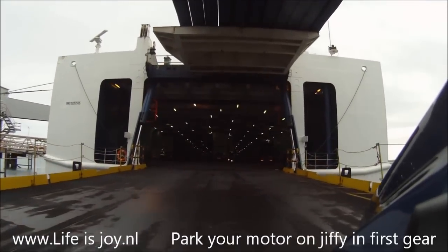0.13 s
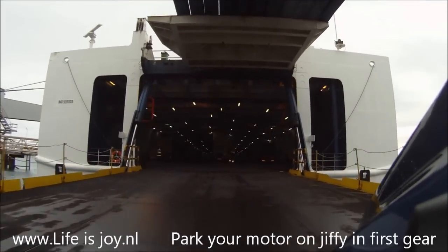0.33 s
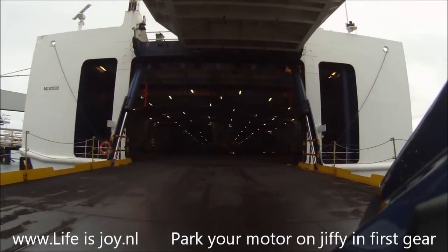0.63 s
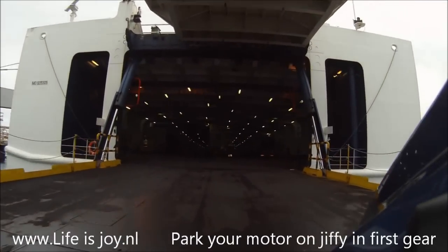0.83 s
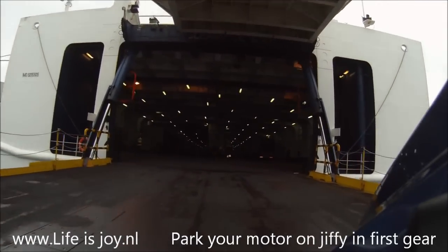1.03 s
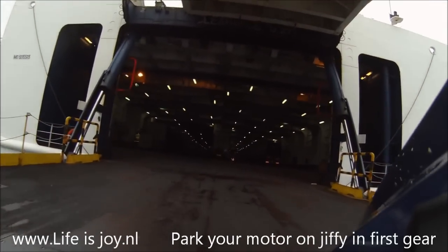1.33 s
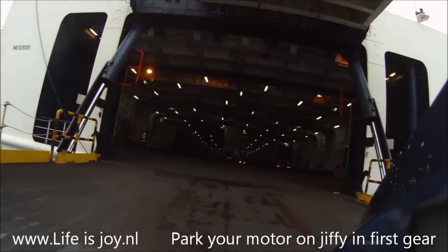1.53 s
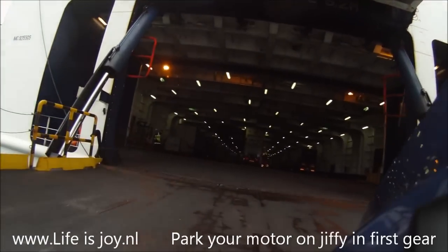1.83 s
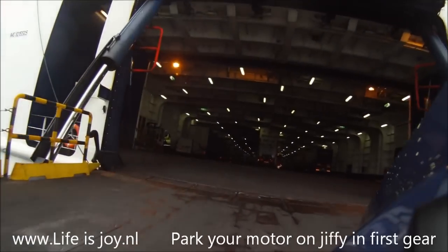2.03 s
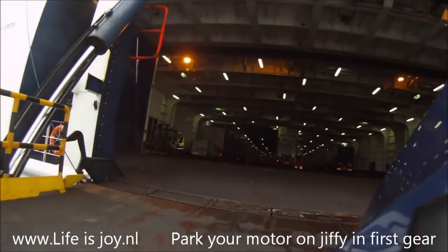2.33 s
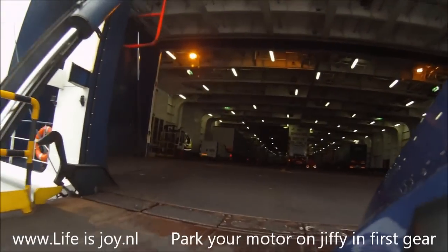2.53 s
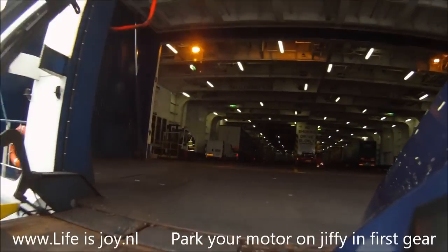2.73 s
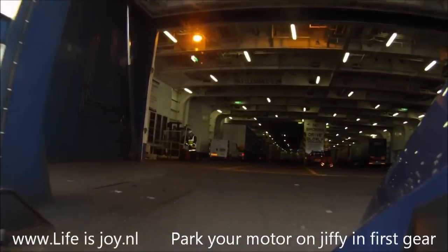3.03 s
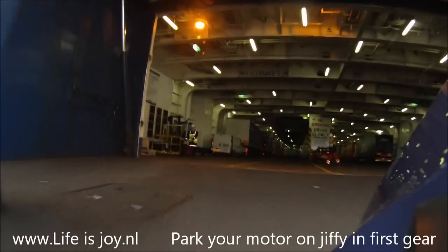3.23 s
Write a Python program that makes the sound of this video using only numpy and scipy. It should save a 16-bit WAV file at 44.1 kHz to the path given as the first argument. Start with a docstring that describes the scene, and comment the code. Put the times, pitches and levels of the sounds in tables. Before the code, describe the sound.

Motorcycle engine clatters and rings steadily up a ramp, then throttle closes and it sags

```python
"""Dense clatter and a frame ring at running speed: a twin-cylinder motorcycle climbs a steel ramp,
heard by a camera in a sealed case. Firings thump a pipe resonance, blows ring frame modes, valve
gear clacks, clicks and noise are coloured by the case. At 2.2 s the throttle closes, the ring drops
away and the engine sags to a tick-over. Filtered noise makes road rumble, hiss, a gust and a weaker
puff; three soft pulses ring the case as knocks."""
import sys
import numpy as np
from scipy import signal
from scipy.io import wavfile
from scipy.ndimage import uniform_filter1d

SR = 44100
rng = np.random.default_rng(int(sys.argv[2]) if len(sys.argv) > 2 else 0)


def wav_record(signal):
    """Record a signal, one row per channel, as 16-bit PCM in the file named by sys.argv[1]."""
    frames = np.transpose(np.atleast_2d(signal))
    bounded = np.clip(frames, -1, 1)
    # unit amplitude maps onto the largest positive 16-bit level
    quanta = np.round(bounded * 32767).astype(np.int16)
    wavfile.write(sys.argv[1], SR, quanta)


def natural_amplitude(level_db):
    """Convert a level in decibels to a linear amplitude factor, elementwise."""
    exponent = np.asarray(level_db, float) / 20
    return 10 ** exponent


N = 149058
T_S = np.arange(N) / SR

# Engine speed: t/s, rate/(cycles/s)
ENGINE_SPEED = [(0, 16.13), (.2, 17.51), (.45, 17.09), (.7, 17.1), (.95, 17.23), (1.2, 17.18), (1.5, 17.29),
                (1.8, 17.17), (2.05, 17.13), (2.17, 17.36), (2.27, 13.98), (2.5, 13.88), (2.65, 11.89),
                (2.85, 10.53), (3.05, 9.43), (3.38, 8.94)]
START_CYCLES = .03
# Source gains: t/s, exhaust thump/dB, frame ring/dB, clacks/dB, clatter/dB, treble hiss/dB
SOURCE_GAINS = [(0, -53, -40.5, -57.5, -37, -60.5), (.1, -58.5, -44.5, -55.5, -39.5, -64),
                (.6, -57, -45, -58, -39, -64.5), (1.1, -58.5, -45, -57.5, -38.5, -64),
                (1.3, -58.5, -43.5, -57, -38, -64), (1.7, -56, -44.5, -54.5, -39.5, -64),
                (2.12, -58, -43.5, -57, -38, -64), (2.2, -60.5, -53, -54.5, -40.5, -64),
                (2.32, -66.5, -86, -55, -42.5, -66), (2.55, -65, -89, -55, -44.5, -67.5),
                (2.8, -69.5, -86, -65.5, -44, -70), (3.05, -66, -85, -65.5, -46, -72),
                (3.38, -67.5, -59, -61, -46, -72.5)]

# Rolling rumble spectrum: f/Hz, relative density/dB
ROAD_SPECTRUM = [(25, -23), (75, -15), (113, -4.5), (151, 0), (335, -10.5), (549, -20), (599, -7),
                 (653, -9), (800, -16), (1040, -67)]
ROAD_START_DB, ROAD_CHANGE_DB = -63.5, -2.5
# Gust spectrum: f/Hz, relative density/dB
GUST_SPECTRUM = [(110, -40), (190, -13.5), (296, -11.5), (500, -12.5), (749, -10.5), (810, -8.5),
                 (1050, -40)]
# Gust, then weaker puff: t/s, gain/dB
GUST_GAIN = [(1.08, -68), (1.13, -53.5), (1.2, -51), (1.33, -54), (1.53, -58.5), (1.62, -60.5),
             (1.8, -67.5), (2.22, -72.5), (2.3, -63), (2.38, -71), (2.8, -99)]
# Wind whistles: start f/Hz, f/Hz half a second on
WIND_MOANS = [(590, 580), (330, 420)]
MOAN_PASS_WIDTH_HZ, MOAN_DB = 12, -9.5

# Hiss spectrum: f/Hz, relative density/dB
HISS_SPECTRUM = [(3180, -13), (5400, -5), (7500, -9.5), (8710, -6), (11000, -15), (11900, -13.5),
                 (13000, -19.5), (15400, -16.5)]
HISS_THROB_PEAK_DB, HISS_WANDER_RMS_DB, HISS_PLACE_CYCLES = 2, .4, .21
HISS_CLICKS_PER_S, HISS_SPREAD_DB, HISS_CLICKS_OVER_NOISE = 650, 3.3, .32

# Knocks on the case: t/s, pulse area/dB, pitch factor
CASE_TAPS = [(2.305, -33, 1), (3.1845, -27, 1), (3.272, -56, .62)]
# Case modes at pitch factor 1: f/Hz, level/dB, t60/s
CASE_MODES = [(1018, -7.5, 0.06), (1233, -1, 0.058), (1286, 5, 0.054)]

# Firings: place/cycles, level/dB
CYLINDER_FIRINGS = [(.919, 0), (.547, -9.5)]
FIRE_JITTER_S, FIRE_SPREAD_DB = .0002, .7
PIPE_HZ, PIPE_PASS_WIDTH_HZ, PIPE_SKIRT_DB = 148.5, 29, -30

# Valve gear: place/cycles, ring f/Hz, first-pass width/Hz, level/dB, twice chatter rise t/s
VALVE_CLACKS = [(.955, 2650, 380, 2.5, .0035), (.955, 3200, 300, -6, .005), (.99, 1850, 220, -5, .008),
                (.97, 1280, 220, 4, .006), (.45, 2600, 380, -2, .003), (.45, 1280, 220, 3, .009),
                (.32, 1280, 220, 0, .004), (.83, 1280, 220, -1, .004), (.83, 4750, 280, -9, .004),
                (.71, 4100, 220, -11, .009)]
CLACK_JITTER_S, CLACK_SPREAD_DB, CLACK_BLOW_OVER_CHATTER = .0004, 1.5, 1.1

# Blows on the lower frame modes: place/cycles, level/dB
LOWER_FRAME_BLOWS = [(.02, 0), (.675, -9)]
# Close pair of frame modes: f/Hz, level/dB, t60/s
FRAME_MODES = [(862, 0, .2), (884, -5, .16)]
# Blows on the higher frame mode: place/cycles, level/dB
UPPER_FRAME_BLOWS = [(.41, 0), (0, -4)]
FRAME_JITTER_S, FRAME_SPREAD_DB, FRAME_ROUGH_GAIN = .00006, .8, .15
UPPER_HZ, UPPER_FIRST_WIDTH_HZ, UPPER_DB = 1051, 71, -5.5

# Clatter colour through the case: f/Hz, relative density/dB
CASE_SPECTRUM = [(460, -42), (813, -31), (883, -7.5), (912, -8), (1120, -6.5), (1330, 1), (1400, -3.5),
                 (1530, -8.5), (1850, -13), (1980, -16), (2220, -23), (2390, -16.5), (2670, -12.5),
                 (2940, -21.5), (3280, -17), (3620, -27.5), (4090, -21), (4410, -24.5), (4830, -18.5),
                 (5110, -23), (5600, -53), (7280, -93)]
CLATTER_CLICKS_PER_S, CLATTER_SPREAD_DB, CLATTER_NOISE_OVER_CLICKS = 2500, 1.2, 1.1
LUMP_FAST_RMS_DB, LUMP_SLOW_RMS_DB = .2, 2
CHUG_PLACE_CYCLES, CHUG_RISE_S, CHUG_GAIN, CHUG_TOP_HZ = .935, .006, 2.8, 3500


def evened(x):
    """Scales to rms 1."""
    return x / np.sqrt(np.mean(x ** 2) + 1e-20)


def curve(rows, column):
    """Interpolates one table column along time."""
    rows = np.array(rows)
    return np.interp(T_S, rows[:, 0], rows[:, column])


def colour(x, points):
    """Minimum-phase filter with the given spectrum, floored at -90 dB; output rms 1."""
    f_hz, level_db = np.transpose(points)
    grid_hz = np.fft.rfftfreq(8192, 1 / SR)
    grid_db = np.interp(np.log(grid_hz + 1), np.log(f_hz + 1), level_db, -90, -90)
    log_gain = np.log(natural_amplitude(np.maximum(grid_db, -90)))
    log_gain = np.r_[log_gain, log_gain[-2:0:-1]]
    # Hilbert transform of the log gain gives the phase
    response = np.fft.ifft(np.exp(np.conj(signal.hilbert(log_gain)))).real[:4096]
    return evened(signal.oaconvolve(x, response)[:N])


def resonate(x, hz, width_hz):
    """One-pole complex resonance, peak gain about 1."""
    pole = np.exp((2j * np.pi * hz - np.pi * width_hz) / SR)
    return 2 * signal.lfilter([1 - abs(pole)], [1, -pole], x).real


def resonate_twice(x, hz, first_width_hz, second_width_hz):
    """Two resonances in series, for steeper skirts."""
    return resonate(resonate(x, hz, first_width_hz), hz, second_width_hz)


def above(x, hz):
    """Steep high-pass."""
    return signal.sosfilt(signal.butter(8, hz, "high", fs=SR, output="sos"), x)


def ring(x, modes):
    """Pulses excite exponentially decaying sine modes."""
    t_s = T_S[:SR // 4]
    response = sum(natural_amplitude(db - 60 * t_s / t60_s) * np.sin(2 * np.pi * hz * t_s) for hz, db, t60_s in modes)
    return signal.oaconvolve(x, response)[:N]


def turns():
    """Integrates engine speed to cycles completed."""
    return START_CYCLES + np.cumsum(curve(ENGINE_SPEED, 1)) / SR


def beats(place_cycles, jitter_s, spread_db):
    """One click per cycle, with normal scatter in time and level."""
    at_s = np.interp(np.arange(-1, 60) + place_cycles, np.r_[-.2, turns()], np.r_[0, T_S], -1, -1)
    chance = rng.standard_normal((len(at_s), 2))
    index = np.round(abs(at_s + jitter_s * chance[:, 0]) * SR).astype(int)
    keep = (at_s >= 0) & (index < N)
    out = np.zeros(N)
    out[index[keep]] = natural_amplitude(spread_db * chance[keep, 1])
    return out


def beat_pattern(rows, jitter_s, spread_db):
    """Sums the clicks of a place and level table."""
    return sum(natural_amplitude(db) * beats(place, jitter_s, spread_db) for place, db in rows)


def grit(clicks_per_s, spread_db, noise_gain):
    """Random clicks of either sign, a few large, over smooth noise."""
    size = natural_amplitude(spread_db * np.minimum(rng.exponential(1, N), 5))
    present = rng.random(N) < clicks_per_s / SR
    clicks = size * present * rng.choice([-1., 1.], N)
    return evened(clicks) + noise_gain * rng.standard_normal(N)


def slow_noise(window):
    """Noise averaged twice over a window in samples; rms 1."""
    return evened(uniform_filter1d(uniform_filter1d(rng.standard_normal(N), window), window))


def air():
    """Tyres and wind: low coloured noise, plus a gust with faint gliding narrow-band moans."""
    gust = colour(rng.standard_normal(N), GUST_SPECTRUM)
    start_s = GUST_GAIN[0][0]
    for start_hz, end_hz in WIND_MOANS:
        glide_hz = np.interp(T_S, [start_s, start_s + .5], [start_hz, end_hz])
        spin = np.exp(2j * np.pi * np.cumsum(glide_hz) / SR)
        flutter = resonate_twice(rng.standard_normal(N), 0, MOAN_PASS_WIDTH_HZ, MOAN_PASS_WIDTH_HZ)
        gust = gust + natural_amplitude(MOAN_DB) * evened((spin * flutter).real)
    road_db = ROAD_START_DB + ROAD_CHANGE_DB * T_S / T_S[-1]
    road = natural_amplitude(road_db) * colour(rng.standard_normal(N), ROAD_SPECTRUM)
    return natural_amplitude(curve(GUST_GAIN, 1)) * gust + road


def hiss():
    """Airborne treble noise that swells twice a cycle and wanders a little."""
    swell_db = HISS_THROB_PEAK_DB * np.cos(4 * np.pi * (turns() - HISS_PLACE_CYCLES))
    throb = natural_amplitude(swell_db + HISS_WANDER_RMS_DB * slow_noise(1800))
    drive = grit(HISS_CLICKS_PER_S, HISS_SPREAD_DB, 1 / HISS_CLICKS_OVER_NOISE) * throb
    return natural_amplitude(curve(SOURCE_GAINS, 5)) * colour(drive, HISS_SPECTRUM)


def taps():
    """Something knocks against the case: soft pulses ring its modes."""
    out = np.zeros(N)
    soft = np.hanning(30)
    for t_s, db, pitch in CASE_TAPS:
        blow = np.zeros(N)
        blow[round(t_s * SR):][:30] = natural_amplitude(db) * soft / soft.sum()
        modes = [(hz * pitch, level_db, t60_s) for hz, level_db, t60_s in CASE_MODES]
        out += above(ring(blow, modes), 800 * pitch)
    return out


def exhaust():
    """Each firing thumps a pipe resonance with a weak, broader skirt."""
    fire = beat_pattern(CYLINDER_FIRINGS, FIRE_JITTER_S, FIRE_SPREAD_DB)
    pipe = evened(resonate_twice(fire, PIPE_HZ, PIPE_PASS_WIDTH_HZ, PIPE_PASS_WIDTH_HZ))
    skirt = evened(resonate(fire, 133, 180))
    return natural_amplitude(curve(SOURCE_GAINS, 1)) * evened(pipe + natural_amplitude(PIPE_SKIRT_DB) * skirt)


def clacks():
    """Valve gear: at fixed places a blow and its short noise chatter excite a resonance."""
    out = np.zeros(N)
    # resonances at the same place share their blows
    hits = {place: beats(place, CLACK_JITTER_S, CLACK_SPREAD_DB) for place, *_ in VALVE_CLACKS}
    for place, hz, width_hz, db, length_s in VALVE_CLACKS:
        t = T_S[:1500] / length_s
        envelope = signal.oaconvolve(hits[place], t * np.exp(-2 * t))[:N]
        noise = envelope * rng.standard_normal(N)
        chatter = evened(resonate_twice(noise, hz, width_hz, 1.07 * width_hz))
        blow = evened(resonate_twice(hits[place], hz, width_hz, 1.07 * width_hz))
        out += natural_amplitude(db) * evened(chatter + CLACK_BLOW_OVER_CHATTER * blow)
    return natural_amplitude(curve(SOURCE_GAINS, 3)) * above(out, 844)


def frame():
    """Blows locked to the cycle ring a close pair of frame modes and one higher up."""
    blows = beat_pattern(LOWER_FRAME_BLOWS, FRAME_JITTER_S, FRAME_SPREAD_DB)
    pair = evened(above(resonate(ring(blows, FRAME_MODES), 890, 70), 825))
    rough = evened(resonate_twice(rng.standard_normal(N), 878, 41, 41))
    blows = beat_pattern(UPPER_FRAME_BLOWS, FRAME_JITTER_S, FRAME_SPREAD_DB)
    upper = evened(resonate_twice(blows, UPPER_HZ, UPPER_FIRST_WIDTH_HZ, 150))
    return natural_amplitude(curve(SOURCE_GAINS, 2)) * (pair + FRAME_ROUGH_GAIN * rough + natural_amplitude(UPPER_DB) * upper)


def clatter():
    """Chain, gears and loose parts rattle through the case; lumpier, with slack-drive chugs, when slow."""
    speed = curve(ENGINE_SPEED, 1)
    depth_db = np.interp(speed, [speed.min(), speed.max()], [LUMP_SLOW_RMS_DB, LUMP_FAST_RMS_DB])
    rattle = grit(CLATTER_CLICKS_PER_S, CLATTER_SPREAD_DB, CLATTER_NOISE_OVER_CLICKS)
    rattle = rattle * natural_amplitude(depth_db * slow_noise(300))
    # slack against speed in cycles/s: strongest at 14, none from 17
    slack = np.interp(speed, [speed.min(), 14, 17], [.5, 1, 0])
    t = T_S[:2000] / CHUG_RISE_S
    hits = beats(CHUG_PLACE_CYCLES, CLACK_JITTER_S, CLACK_SPREAD_DB)
    chug = slack * signal.oaconvolve(hits, t ** 2 * np.exp(2 - 2 * t))[:N]
    chug = chug * rng.standard_normal(N)
    chug = signal.sosfilt(signal.butter(4, CHUG_TOP_HZ, fs=SR, output="sos"), chug)
    return natural_amplitude(curve(SOURCE_GAINS, 4)) * colour(rattle + CHUG_GAIN * chug, CASE_SPECTRUM)


def scene():
    """Sums all sources, one channel."""
    return (air() + hiss() + taps() + exhaust() + clacks() + frame() + clatter())[None]


def top_cut(x):
    """Nothing passes above the cut-off."""
    return signal.sosfilt(signal.butter(12, 16010, fs=SR, output="sos"), x)


def record(dry):
    """Linear-phase low-pass at the camera's band limit, then its finished output."""
    low_pass = signal.firwin(1023, 15290, window=("kaiser", 9), fs=SR)  # cutoff/Hz
    mix = signal.oaconvolve(dry, low_pass[None], "same")
    return top_cut(mix)


dry = scene()
out = record(dry)
wav_record(out)
```